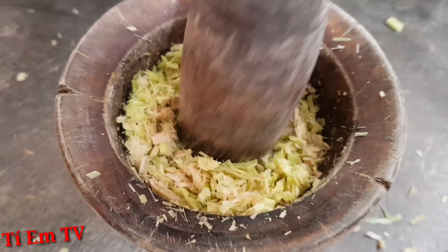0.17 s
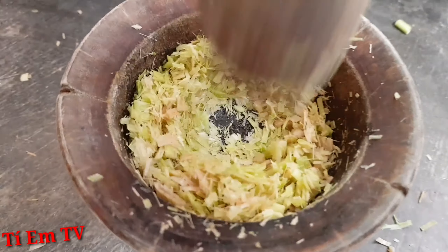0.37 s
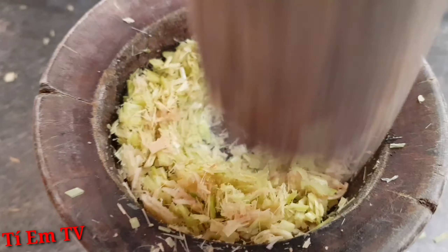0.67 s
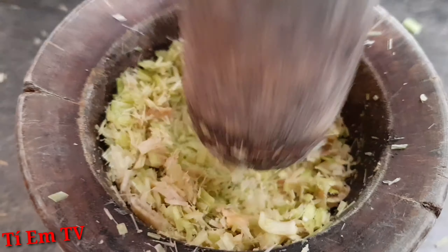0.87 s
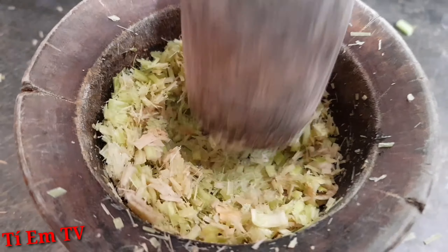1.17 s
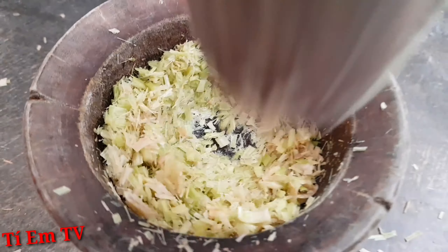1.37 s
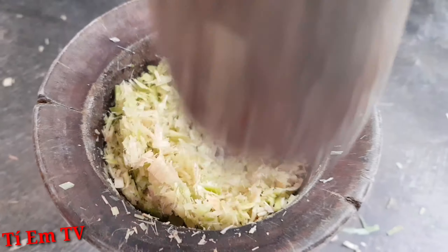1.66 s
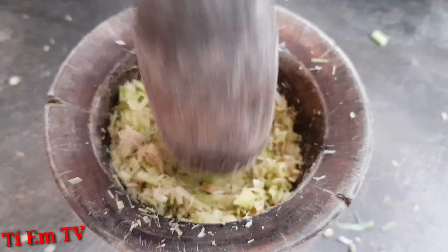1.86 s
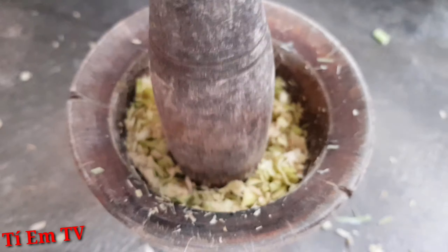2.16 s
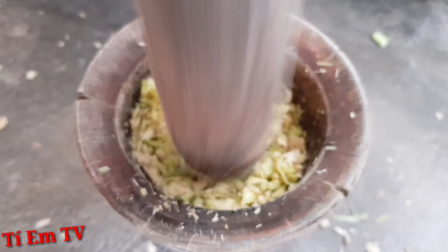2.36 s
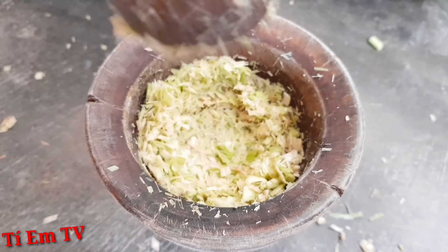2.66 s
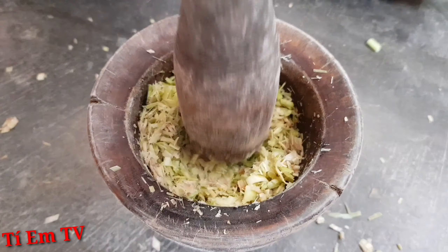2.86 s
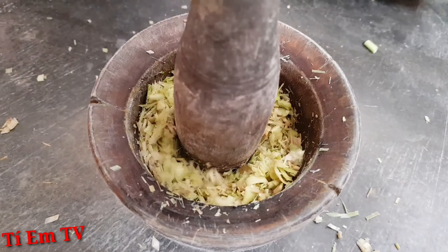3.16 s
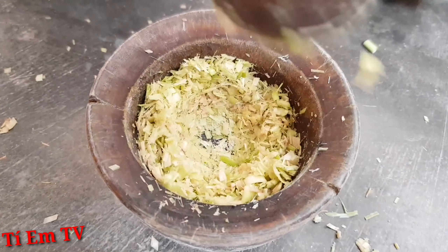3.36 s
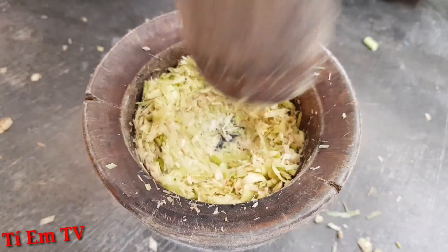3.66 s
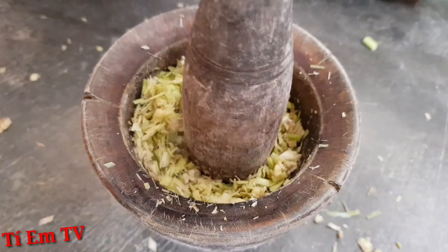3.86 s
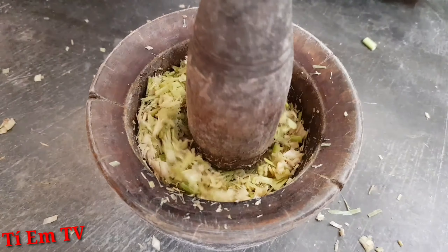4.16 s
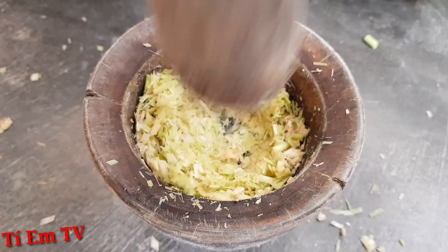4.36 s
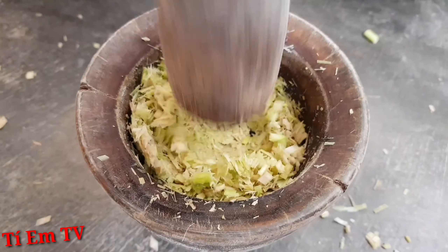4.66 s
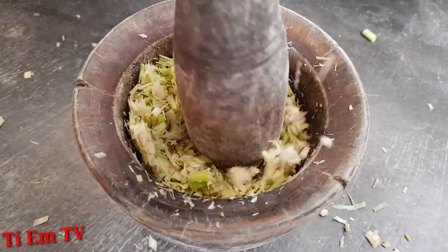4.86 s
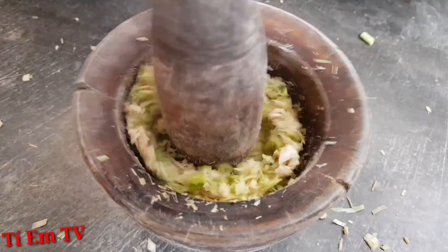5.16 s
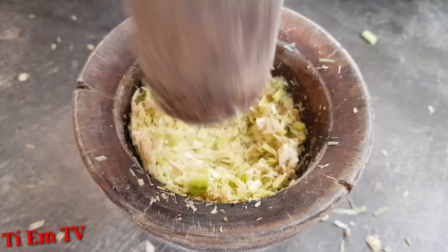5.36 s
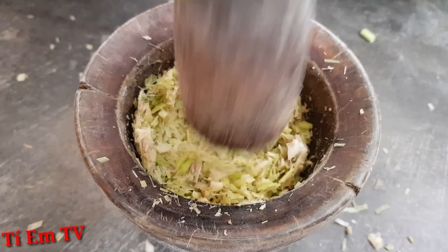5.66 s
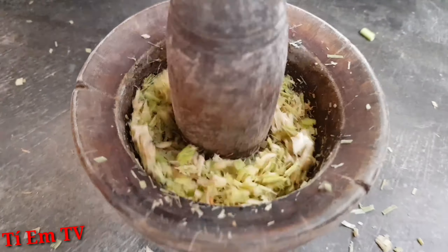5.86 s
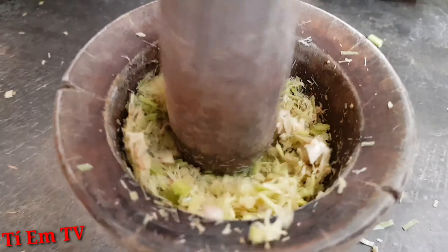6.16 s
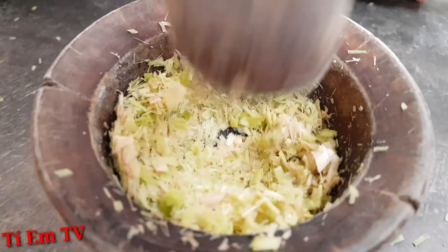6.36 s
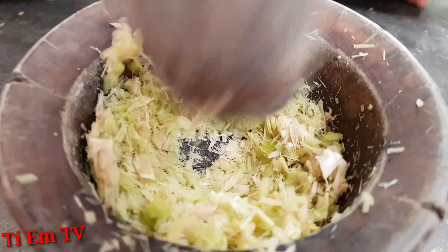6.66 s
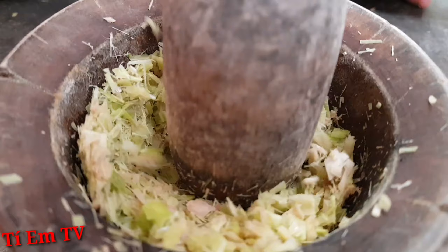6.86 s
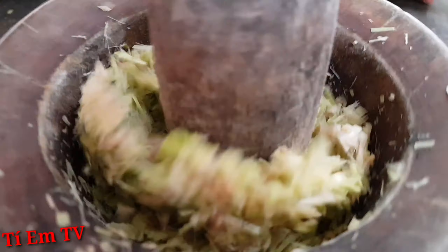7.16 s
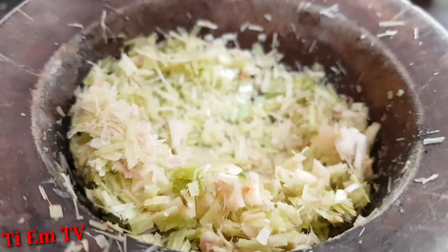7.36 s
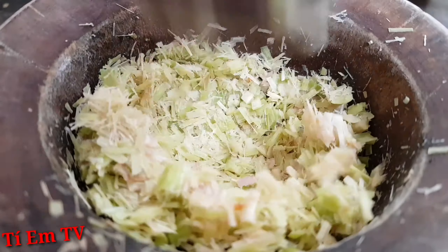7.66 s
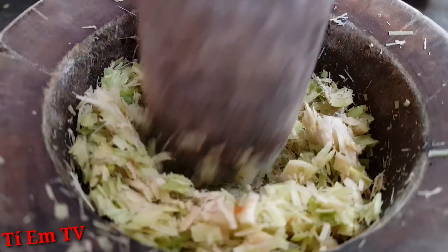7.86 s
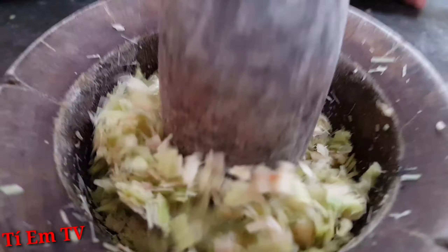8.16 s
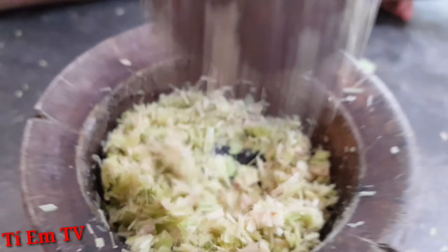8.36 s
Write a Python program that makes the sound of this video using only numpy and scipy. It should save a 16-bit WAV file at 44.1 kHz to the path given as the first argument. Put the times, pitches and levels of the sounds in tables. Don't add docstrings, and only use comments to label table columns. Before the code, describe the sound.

Close, dry pounding of a wooden pestle in a wooden mortar, about three blows a second and uneven in strength. Each gives a hollow knock, a brief crunch of plant fibres and a low thump into the floor. Some rebound with quick clacks and rattles, more often late. A small kitchen answers briefly; faint clatter and very soft far bird hoots lie behind, over quiet phone microphone hiss and rumble.

```python
import sys
import numpy as np
from scipy import signal
from scipy.fft import rfft, irfft, next_fast_len
from scipy.io import wavfile
from scipy.ndimage import uniform_filter1d, map_coordinates

SR = 44100
rng = np.random.default_rng(int(sys.argv[2]) if len(sys.argv) > 2 else 0)


def gain_from_decibels(decibels):
    exponent = np.asarray(decibels, float) / 20
    return 10 ** exponent


def generate_wav(sig):
    pcm = np.round(np.clip(np.atleast_2d(sig).T, -1, 1) * 32767).astype(np.int16)
    wavfile.write(sys.argv[1], SR, pcm)


N = 374850
T = np.arange(SR // 3) / SR

# t/s, peak level/dB, contact f/Hz, hardness/dB, swings of the click/cycles
LANDINGS = [(0.1291, -2.5, 1594, -12, 0.78), (0.5045, -4.5, 1507, -17, .7), (0.82, -24.5, 1422, -22.5, 2.7),
            (1.1457, -15.5, 1535, -14, 0.34), (1.5288, -5, 1335, -21.5, .9),
            (1.8142, -13.5, 1038, -16.5, 0.97), (2.1624, -2, 1316, -15.5, 0.67),
            (2.4807, -17.5, 1290, -9.5, .8), (2.8412, -6.5, 1436, -19, 0.73), (3.1935, -2, 1414, -14, 0.61),
            (3.5507, -10, 1265, -7.5, .7), (3.8707, 0, 1367, -23.5, 0.77), (4.228, -12.5, 1428, -12, 0.77),
            (4.5726, 0, 1370, -14.5, 0.88), (4.919, -12.5, 1332, -14, 0.89), (5.2695, 1, 1200, -27, 0.93),
            (5.612, 2, 1382, -31.5, 0.63), (5.9604, -2.5, 1270, -23, 0.64),
            (6.2717, -6.5, 1380, -18.5, 0.89), (6.5809, -2, 1670, -20.5, 1.8),
            (6.9111, -15.5, 1225, -37, 1.2), (7.2361, -4, 1147, -19, .9), (7.5521, -3, 1462, -24, .65),
            (7.9074, -12, 1300, -16, 0.35), (8.2256, -0.5, 1339, -23.5, 1)]
# t/s, peak level/dB, contact f/Hz, hardness/dB
REBOUNDS = [(0.135, -5, 1416, -22), (0.1417, -17, 1300, -12), (0.1596, -22.5, 1650, -16),
            (0.515, -3, 1362, -33.5), (0.839, -36, 1050, -26), (1.156, -11.5, 1140, -37),
            (1.8374, -2.5, 1334, -28.5), (2.1726, -9.5, 1326, -31), (3.5564, -14.5, 1167, -30),
            (4.2373, 0, 1270, -30.5), (4.5989, 1.5, 1380, -20.5), (4.61, -12, 1390, -10),
            (4.6268, -20, 1200, -5.5), (5.2742, -12, 1200, -37), (5.6183, -6, 1227, -20),
            (6.3111, -23.5, 1090, -25), (7.2583, -6.5, 1030, -50), (7.2679, -3.5, 1249, -22.5),
            (7.294, -9, 1200, -24), (7.578, -2, 1290, -24.5), (7.5818, -5.5, 1396, -23.5),
            (7.5923, -15, 1290, -30.5), (7.669, -33, 1070, -22), (8.2424, -1.5, 1140, -29),
            (8.274, -14, 1070, -45)]
# t/s, peak level/dB
TOUCHES = [
    (1.5137, -33.5),
    (1.5201, -30),
    (2.1499, -31),
    (5.2581, -36),
    (6.9012, -29.5),
]
# t/s, peak level/dB, f/Hz, swings/cycles
TICKS = [(0.5053, -12, 914, .35), (1.1486, -24, 699, 0.47), (1.5263, -12, 1000, 0.56),
         (1.8361, -16.5, 900, 0.7), (1.8428, -19, 1200, 1.1), (2.8417, -13.5, 790, 0.62),
         (3.1966, -8.5, 990, .4), (3.5524, -15.5, 790, 0.34), (3.8965, -28, 1064, 0.81),
         (3.9016, -21.5, 1190, .8), (4.2439, -14, 1150, 1.13), (4.5784, -12, 1260, 1.2),
         (4.584, -9.5, 1334, 0.65), (4.5969, -9, 1108, .8), (4.639, -21.5, 1290, .8),
         (5.6455, -21.5, 1520, 1), (5.6523, -21, 1218, 0.62), (5.963, -8.5, 1050, 1.04),
         (6.606, -23, 1610, 1.2), (6.6169, -32, 1536, 1.9), (7.2736, -17, 1304, 1.7),
         (7.2832, -19.5, 1090, 1.1), (7.5579, -17, 1396, 0.99), (7.5882, -8, 1160, 0.46),
         (7.5966, -16.5, 1040, 1.6), (7.605, -25, 1288, 1), (7.9092, -8, 1105, 0.41),
         (8.2483, -25, 1080, 1.25)]
# t/s, level/dB, fall per higher group of modes/dB, boost of every other group/dB
GLANCES = [(0.1304, -21.5, 2.5, -4.5), (0.1342, -17.5, 7, 0.5), (0.5029, -19, 11, 2),
           (0.5135, -33.5, 7, 4.5), (1.8377, -29, 7.5, -1), (2.1619, -32, 2, 2), (4.5751, -24, 12, 4.5),
           (4.5981, -25.5, 0.5, 5.5), (5.2691, -32, 10, -3.5), (5.6123, -24.5, 8.5, 2), (6.579, -23, 6, 2),
           (7.2359, -21, 10, 12.5), (7.2656, -26.5, 5.5, 7.5), (7.5507, -20.5, 7, 5), (7.578, -28, 2, 7.5),
           (8.2422, -22.5, 21.5, 6)]
# t/s, f/Hz, level/dB, time to fall 60 dB/s
SINGING = [(0.134, 3400, -22, .08), (0.5045, 2598, -15, .012), (0.515, 1032, -15.5, .05),
           (2.1627, 994, -16, .06), (3.194, 1580, -16, .03), (4.6, 3480, -27.5, 0.24),
           (5.2705, 673, -21.5, 0.096), (6.582, 488, -24, 0.11), (7.2373, 1770, -9, 0.037),
           (7.5533, 1750, -12, 0.04), (7.579, 487, -19, 0.14), (4.574, 1720, -13.5, 0.076),
           (7.91, 1480, -18.5, .02)]
# t/s, level/dB, tilt/dB per octave, time to fall 60 dB/s
SHAKES = [(0.1306, -23, -2.5, 0.23), (0.5035, -32.5, -5.5, 0.15), (1.84, -42, -5.5, 0.18),
          (2.1625, -34.5, -3.5, 0.17), (3.195, -38, -7.5, 0.25), (4.5735, -32, -3.5, .15),
          (4.5974, -29, -2, 0.25), (5.27, -37.5, -4.5, .2), (5.6125, -32.5, -5.5, 0.28),
          (6.581, -26.5, -6.5, 0.23), (7.2364, -36, -6.5, 0.25), (7.267, -31.5, -7, .2),
          (7.552, -32.5, -13, 0.13), (7.5785, -29, -6, 0.23), (8.243, -34, -8.5, 0.195)]
# t/s, peak level/dB, rise/ms, fall/ms
CRUNCHES = [(0.128, -34, 1.7, 2.6), (0.5051, -24, 1.4, 1.5), (0.5149, -28, 1.5, 2.2),
            (0.8149, -38, 2.7, 1.7), (1.1497, -29.5, 0.82, 2.6), (1.5171, -26.5, 4.5, 1.9),
            (1.8328, -33, 5, 3), (2.1546, -35.5, 7, 3.4), (2.4822, -16.5, 0.74, 1.2),
            (2.84, -17.5, 2.1, 1.6), (3.1962, -14, 0.77, 1.3), (3.5498, -15, 0.55, 2.5),
            (3.866, -24.5, 2.9, 2.5), (4.229, -17, 1.5, 3.1), (4.5709, -30, 2.4, 2.6),
            (4.588, -23.5, 7.3, 3.6), (4.92, -13.5, 1.2, 1.5), (5.26, -26, 4.4, 2.7),
            (5.5992, -28.5, 4.1, 6.6), (5.9529, -29.5, 2.8, 4.3), (6.27, -19, 1, 2.1),
            (6.583, -26.5, 1.8, 3.1), (6.903, -18.5, 1.6, 3.9), (7.246, -23, 3.5, 1.9),
            (7.5537, -33.5, 1.3, 3.9), (7.5648, -21, 4.3, 1.4), (7.91, -14.5, 1.5, 0.61),
            (8.2252, -22.5, 2.3, 3.8), (8.2459, -34.5, 1.8, 1.3), (8.366, -34, 1.6, 1.9)]
# t/s, push level/dB, ring level/dB, air-puff level/dB
THUMPS = [(0.1424, -24.5, -21, -17.5), (0.5056, -16, -33, -19.5), (0.8146, -39.5, -29, 2),
          (1.1466, -21.5, -27.5, -12.5), (1.5283, -20, -38, -5.5), (1.837, -32, -24.5, -3.5),
          (2.1609, -34.5, -18, -10.5), (2.482, -17.5, -23, -14), (2.8396, -17, -21.5, -8),
          (3.194, -10, -26.5, -21), (3.5508, -12.5, -23.5, -31), (3.8692, -28, -18, -12),
          (4.2275, -22.5, -18.5, -20.5), (4.57, -27, -17.5, -4.5), (4.9188, -16, -21.5, -23),
          (5.27, -25, -23, -13.5), (5.6199, -35, -13, -11), (5.9613, -19, -33, -22.5),
          (6.273, -15, -23.5, -7), (6.5816, -12.5, -24, -8.5), (6.9061, -24, -18, 0),
          (7.2359, -21, -23, -0.5), (7.5502, -20.5, -26, -7), (7.9082, -11.5, -29, -20),
          (8.2224, -29, -16, 9.5)]
# t/s, peak level/dB, f/Hz, time to fall 60 dB/s, ringing share/0-1
CLATTER = [
    (1.059, -39.5, 2450, 0.056, 0.05),
    (1.069, -43, 2280, 0.05, 0),
    (1.069, -44.5, 650, 0.18, 0.34),
    (6.416, -30, 1250, 0.38, 0.53),
    (6.417, -51, 2150, 0.43, 0.77),
    (8.366, -27, 678, 0.13, 0.62),
    (8.365, -24.5, 2600, 0.048, 0.14),
    (8.403, -39.5, 643, 0.088, 1),
]
# t/s, length/s, f/Hz, level/dB
HOOTS = [(1.198, 0.29, 756, -74.5), (1.24, .2, 733, -80), (1.596, .18, 727, -78), (1.88, 0.32, 726, -73),
         (2.293, 0.2, 758, -70.5), (5.41, 0.13, 724, -65), (5.49, .12, 743, -67.5),
         (5.659, 0.148, 798, -62), (5.775, 0.18, 734, -71), (6.053, 0.15, 757, -69.5),
         (6.11, .14, 728, -67)]

# f/Hz, level/dB, time to fall 60 dB/s
WOOD_MODES = [(487, -4, 0.13), (671, -11.5, 0.13), (872.3, -14, 0.09), (909, -9.5, 0.12),
              (1012.3, -5.5, 0.055), (1220, -4.5, 0.075), (1270, -6.5, 0.028), (1380, -16, 0.058),
              (1520, -5.5, 0.049), (1614, -2.5, 0.02), (1750, -12.5, 0.094), (2028, -19, 0.12),
              (2600, -27, .03)]
# f/Hz, level/dB, time to fall 60 dB/s
RIM_MODES = [(1770, 4, 0.05), (1840, -13.5, .07), (2290, -2, 0.12), (2450, -9.5, 0.049), (3444, -1, 0.074),
             (3680, -10.5, 0.079), (4680, -8, 0.049), (5130, -1, 0.051)]
# f/Hz, level/dB, time to fall 60 dB/s
BASE_MODES = [(58.3, -10, 0.26), (103.6, -13, 0.42), (166, -7.5, 0.15), (197.5, -0.5, 0.3),
              (251, -9.5, 0.13), (283, -6, 0.22), (327, -4.5, 0.28), (444, -5, 0.071)]
# f/Hz, level/dB
CRACK = [(1500, -19.5), (2400, 7), (3500, -10), (5200, -3.5), (7000, -24.5), (12000, -14.5), (16000, -31)]
# f/Hz, level/dB
WASH = [(200, -24.5), (450, -0.5), (2300, 4.5), (2900, -7.5), (3500, -3), (5500, -5), (6100, -24),
        (16000, -55.5)]
# f/Hz, level/dB
FIBRES = [(300, -28), (1000, 6.5), (3000, -2.5), (6000, -7.5), (8000, -6.5), (11000, -0.5), (15000, -12.5)]
# f/Hz, time to fall 60 dB/s
KITCHEN = [(100, 0.93), (400, 0.39), (1200, 0.3), (3000, 0.38), (8000, 0.083)]
# f/Hz, level/dB
HISS = [(300, -47.5), (500, -16.5), (650, -5.5), (2500, -5), (6500, -7), (7700, -11.5), (8300, -4.5),
        (11500, -2.5), (15400, -6.5), (15800, -48.5)]
# f/Hz, level/dB
RUMBLE = [(15, -37), (30, -10), (102, -8.5), (192, -13), (230, -12.5), (255, -16), (315, -16), (900, -24.5),
          (1170, -65), (1980, -120)]
# f/Hz, likeness/0-1
ALIKE = [(60, 1), (290, 1), (640, 0.17), (1400, 0.12)]
# t/s, level/dB
GAIN = [(0, -66), (0.38, -72), (1.09, -72.5), (1.63, -69), (2.15, -71), (2.67, -63.5), (3.291, -64.5),
        (4.57, -62), (4.76, -64.5), (6.56, -64), (7.38, -65), (8.5, -66.5)]
# t/s, left-right level/dB
PHONE_DRIFT = [(0, -2), (1, 2), (1.8, 3.5), (2.4, 0), (3.5, -2.5), (4.6, -.5), (4.9, 2), (5.3, -0.5),
               (5.9, 1), (6.5, -1), (6.9, 4), (7.3, 3), (8.5, 6)]
# f/Hz, left-right level/dB
SHADE = [(300, 2), (1500, 0.5), (1900, -4.5), (2600, -5), (3100, -1.5), (3500, 3), (5500, 3), (9000, -0.5)]

LAG = 7
SPOTS = 5
TAKES = 6
TOUCH_HZ, TOUCH_HARD_DB, REBOUND_SWINGS = 1200, -3.5, 0.67
LANDING_RING_DB, REBOUND_RING_DB = -7.5, -8
RING_PER_HARD = 0.29
CRUNCH_PAN_DB = 6.5
PUSH_HZ, PUSH_HZ_PER_DB = 490, 10.5
CLATTER_PAN_DB_PER_OCTAVE = -11
RUMBLE_DB = -0.25
LOW_CUT_HZ, TOP_HZ = 34, 16000


def along(points, hz):
    f, v = np.transpose(points)
    return np.interp(np.log(hz + 1), np.log(f + 1), v)


def coloured(shape, spectrum):
    hz = np.fft.rfftfreq(shape[-1], 1 / SR)
    x = irfft(rfft(rng.standard_normal(shape)) * gain_from_decibels(along(spectrum, hz)), shape[-1])
    return x / x.std()


def ring(hz, t60, attack):
    return np.sin(2 * np.pi * hz * T) * gain_from_decibels(-60 * T / t60) * (1 - np.exp(-T / attack))


def wavelet(hz, cycles, delay):
    t = T - delay
    return np.sin(2 * np.pi * hz * t) * np.exp(-(t * hz / cycles) ** 2)


def grainy(modes, attack, rough, rate, count=TAKES):
    knots = rng.standard_normal((2, count, len(modes), int(rate * T[-1]) + 2))
    whole, part = np.divmod(T * rate, 1)
    whole = whole.astype(int)
    size_drift, phase_drift = knots[..., whole] * (1 - part) + knots[..., whole + 1] * part
    hz, db, t60 = np.transpose(modes)[..., None]
    fade = gain_from_decibels(db - 60 * T / t60) * (1 - np.exp(-T / attack))
    return fade * (1 + rough * size_drift) * np.sin(2 * np.pi * hz * T + 2 * rough * phase_drift)


def pick(takes, shape):
    return takes[rng.integers(TAKES, size=shape), np.arange(shape[-1])]


def silence():
    return np.zeros((SPOTS, 2, N + SR))


def add(air, s, pair, pan_db, lag=LAG):
    spot, at = air[int(s * 3) % SPOTS], round(s * SR)
    spot[0, at:at + len(T)] += pair[0] * gain_from_decibels(pan_db / 2)
    spot[1, at + lag:at + lag + len(T)] += pair[1] * gain_from_decibels(-pan_db / 2)


def mortar_pan_db(s):
    return np.interp(s, *np.transpose(PHONE_DRIFT))


def contacts():
    touches = [(s, db, TOUCH_HZ, TOUCH_HARD_DB) for s, db in TOUCHES]
    lesser = [(*row, REBOUND_SWINGS) for row in REBOUNDS + touches]
    kinds = [(LANDINGS, LANDING_RING_DB), (lesser, REBOUND_RING_DB)]
    return [(s, db, hz, hard, swings, mortar_pan_db(s), ring_db + RING_PER_HARD * hard)
            for rows, ring_db in kinds for s, db, hz, hard, swings in rows]


def knocks():
    air, hz = silence(), np.array(WOOD_MODES)[:, 0]
    wood = grainy(WOOD_MODES, attack=.0018, rough=.55, rate=120)
    splash = gain_from_decibels(-60 * T / 0.011) + gain_from_decibels(-24.5 - 60 * T / 0.12)
    splash *= 1 - np.exp(-T / 0.00096)
    for s, db, pitch, hard_db, swings, pan_db, ring_db in contacts():
        click = 0.92 * wavelet(pitch * .9, swings, .0012) - .3 * ring(pitch, 0.015, 0.0034)
        modes = pick(wood, (len(hz),))
        chance_db = rng.normal(0, 2, len(hz)) + rng.normal(0, 2, (2, len(hz)))
        struck = gain_from_decibels(ring_db - 6.7 * np.log2(hz / pitch) ** 2 + chance_db)
        crack = coloured((2, len(T)), CRACK) * gain_from_decibels(hard_db) * splash
        add(air, s, gain_from_decibels(db) * (click + struck @ modes + 1.264 * crack), pan_db)
    return air


def ticks():
    air, t = silence(), T - .004
    for s, db, pitch, swings in TICKS:
        swing = np.cos(2 * np.pi * pitch * t) * np.exp(-(t * pitch / swings) ** 2)
        add(air, s - .004, gain_from_decibels(db) * swing * np.ones((2, 1)), mortar_pan_db(s))
    return air


def rim():
    air, group = silence(), np.arange(len(RIM_MODES) // 2)
    rough = np.array([.5, .5, 1, 1, .9, 1.2, 1.2, 1])[:, None]
    lip = grainy(RIM_MODES, attack=.0006, rough=rough, rate=330)
    for s, db, fall_db, side_db in GLANCES:
        group_db = db - fall_db * group + side_db * (-1) ** group
        modes = pick(lip, (2, len(RIM_MODES)))
        struck = gain_from_decibels(np.repeat(group_db, 2) + np.repeat([-3.5, 7.0, -2.0, 3.5], 2))
        add(air, s, struck @ (.7 * modes[0] + .6 * modes), pan_db=-1, lag=13)
    return air


def singing():
    air = silence()
    voices = grainy([row[1:] for row in SINGING], attack=.001, rough=.55, rate=90, count=2)
    for k, row in enumerate(SINGING):
        add(air, row[0], 1.3 * voices[0, k] + .3 * voices[:, k], pan_db=0.0)
    return air


def wash():
    air = silence()
    for s, db, tilt_db, t60 in SHAKES:
        colour = [(hz, level + tilt_db * np.log2(hz / 1000)) for hz, level in WASH]
        fade = gain_from_decibels(db - 60 * T / t60) * (1 - np.exp(-T / .003))
        add(air, s, fade * coloured((2, len(T)), colour), pan_db=-4.0)
    return air


def crunches():
    air, t = silence(), (T - .02) * 1000
    for s, db, rise_ms, fall_ms in CRUNCHES:
        swell = gain_from_decibels(-8 * np.where(t < 0, (t / rise_ms) ** 2, t / fall_ms))
        swell += gain_from_decibels(-23.0 - 60 * t / 120) * (t > 0)
        snaps = gain_from_decibels(16 * uniform_filter1d(rng.standard_normal(len(T)), size=24))
        shared, own = coloured((1, len(T)), FIBRES), coloured((2, len(T)), FIBRES)
        fibres = swell * snaps * (0.058 * shared + 1.0 * own)
        add(air, s - .02, gain_from_decibels(db - 7.5) * fibres, CRUNCH_PAN_DB, lag=30)
        squeeze = wavelet(180, 0.87, .006) * np.ones((2, 1))
        add(air, s - .006, gain_from_decibels(db - 12.5) * squeeze, pan_db=3.0)
    return air


def thumps():
    air = silence()
    floor_modes = grainy(BASE_MODES, attack=0.0025, rough=0.77, rate=30)
    for (s, db, ring_db, puff_db), landing in zip(THUMPS, LANDINGS):
        pitch = PUSH_HZ + PUSH_HZ_PER_DB * landing[1]
        push = 1.147 * wavelet(pitch, 0.56, .0025) + .4 * ring(pitch, 0.044, 0.00033)
        modes = pick(floor_modes, (len(BASE_MODES),))
        base = gain_from_decibels(ring_db + 6.5 + rng.normal(0, 2.5, (2, len(BASE_MODES)))) @ modes
        puff = gain_from_decibels(puff_db + 0.5 + np.array([[0], [-13]])) * wavelet(53, 0.28, 0.014)
        add(air, s - .001, gain_from_decibels(db) * (push + base + puff), pan_db=-0.5)
    return air


def clatter():
    air = silence()
    for s, db, pitch, t60, share in CLATTER:
        pan_db = CLATTER_PAN_DB_PER_OCTAVE * np.log2(pitch / 700)
        colour = [(pitch / 3, -24), (pitch * .85, -10 * share), (pitch, 0),
                  (pitch * 1.15, -10 * share), (pitch * 2.6, -14), (15000, -30)]
        click = 0.078 * coloured((2, len(T)), colour) * gain_from_decibels(-60 * T / t60)
        add(air, s, gain_from_decibels(db) * (share * ring(pitch, t60 * 0.24, 0.00048) + click), pan_db, lag=0)
    return air


def kitchen(air):
    hz, t, z = signal.stft(rng.standard_normal((SPOTS, 2, SR // 2)), SR, nperseg=256)
    fade = gain_from_decibels(-60 * t / along(KITCHEN, hz)[:, None])
    tail = signal.istft(z * fade, SR, nperseg=256)[1]
    tail *= (1 - np.exp(-np.arange(tail.shape[-1]) / 200)) / np.linalg.norm(tail[0, 0])
    return signal.oaconvolve(air.mean(1, keepdims=True), tail, axes=2).sum(0)[:, :N]


def bird():
    air = silence()
    for s, length, pitch, db in HOOTS:
        colour = [(pitch * .95, -50), (pitch * .985, -6), (pitch, 0), (pitch * 1.015, -6), (pitch * 1.05, -50)]
        swell = np.sin(np.pi * np.clip(T / length, 0, 1))
        add(air, s, gain_from_decibels(db) * coloured((2, len(T)), colour) * swell, pan_db=-3.0, lag=0)
    return air.sum(0)[:, :N]


def hiss_and_rumble():
    t, m = np.arange(N) / SR, next_fast_len(N)
    gain_db = np.interp(t, *np.transpose(GAIN))
    turn = np.arccos(np.clip(along(ALIKE, np.fft.rfftfreq(m, 1 / SR)), -1, 1)) / 2
    mid, side = irfft(rfft(coloured((2, m), RUMBLE)) * [np.cos(turn), np.sin(turn)], m)[:, :N]
    heave_db = 2 * map_coordinates(rng.standard_normal(100), [t * 9])
    rumble = gain_from_decibels(gain_db + RUMBLE_DB + heave_db) * np.array([mid + side, mid - side])
    return rumble + gain_from_decibels(gain_db + 4.0) * coloured((2, m), HISS)[:, :N]


def scene():
    air = knocks() + ticks() + rim() + singing() + wash() + crunches() + thumps() + clatter()
    near, m = air.sum(0)[:, :N] + gain_from_decibels(-22.5) * kitchen(air), next_fast_len(N)
    shade_db = along(SHADE, np.fft.rfftfreq(m, 1 / SR)) / 2
    shaded = irfft(rfft(near, m) * gain_from_decibels([shade_db, -shade_db]), m)[:, :N]
    return shaded + bird() + hiss_and_rumble()


def roll_off(x):
    return signal.sosfilt(signal.butter(12, 16510, fs=SR, output="sos"), x)


def record(dry):
    band = signal.butter(4, LOW_CUT_HZ, "high", fs=SR, output="sos")
    top = signal.butter(8, TOP_HZ, fs=SR, output="sos")
    heard = signal.sosfilt(band, dry)
    rounded = heard / (1 + np.abs(heard) ** 8) ** (1 / 8)
    mix = np.clip(signal.sosfilt(top, rounded), -1, 1)
    return roll_off(mix)


dry = scene()
out = record(dry)
generate_wav(out)
```